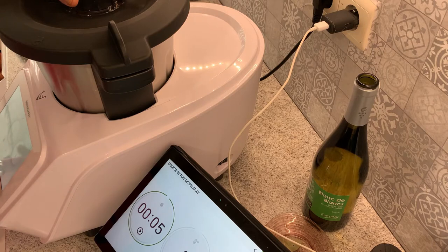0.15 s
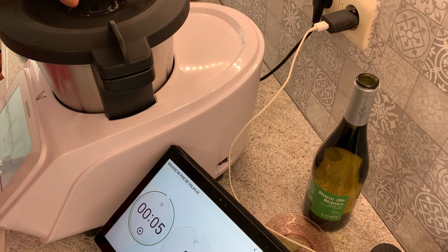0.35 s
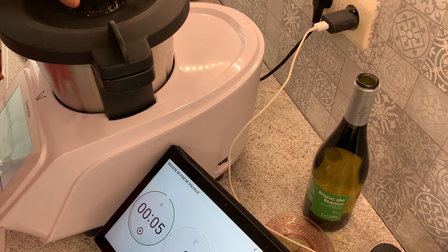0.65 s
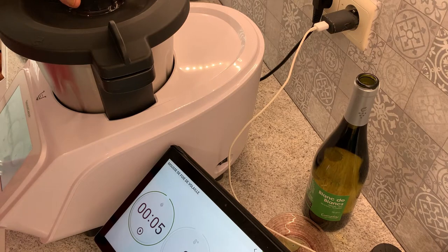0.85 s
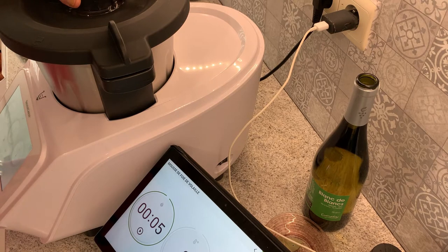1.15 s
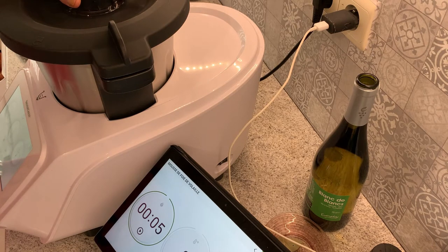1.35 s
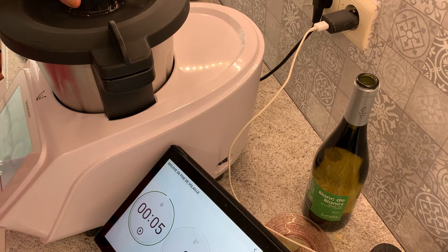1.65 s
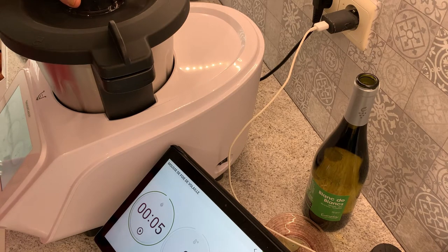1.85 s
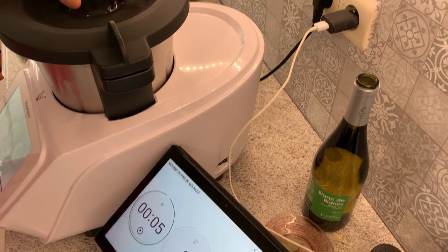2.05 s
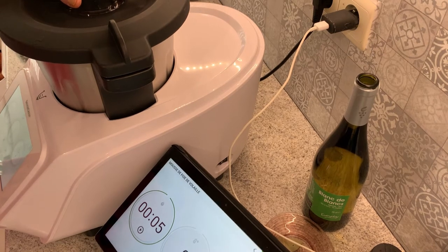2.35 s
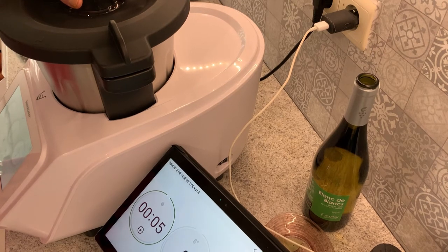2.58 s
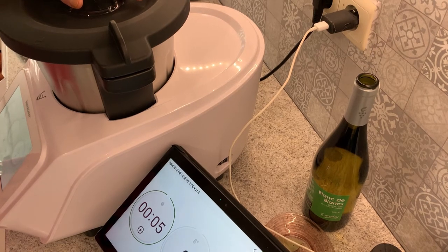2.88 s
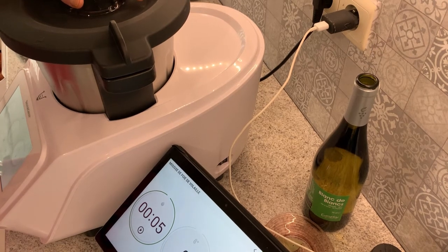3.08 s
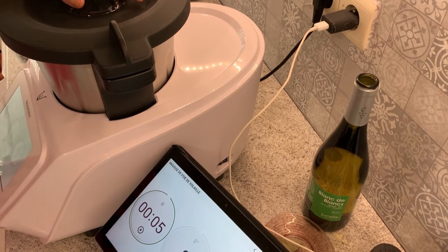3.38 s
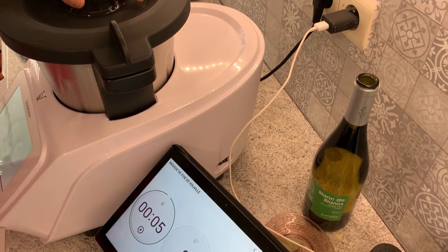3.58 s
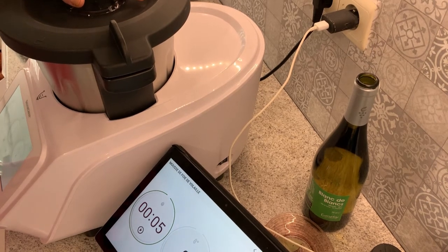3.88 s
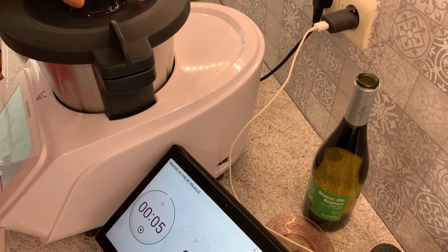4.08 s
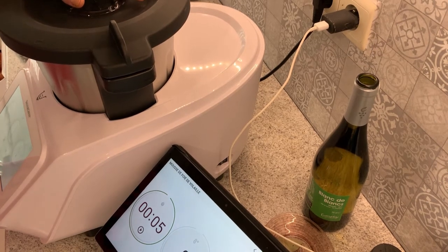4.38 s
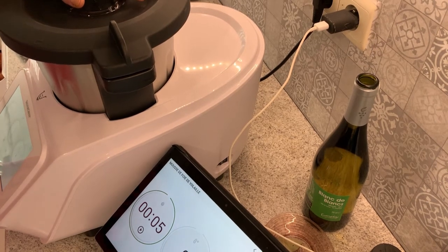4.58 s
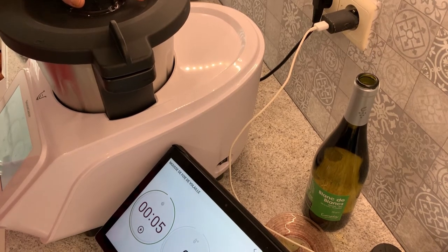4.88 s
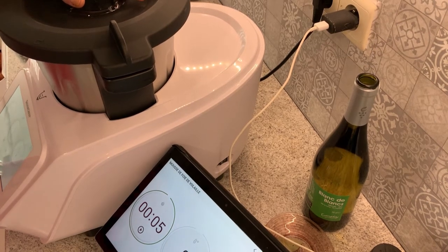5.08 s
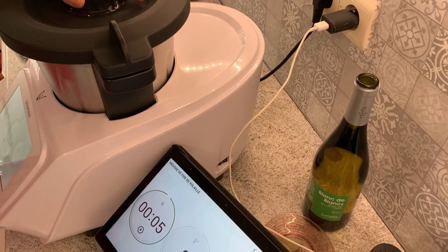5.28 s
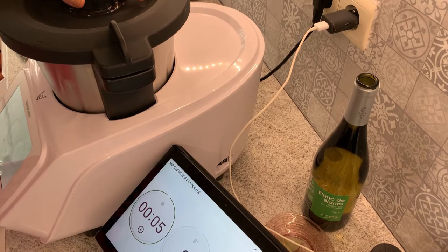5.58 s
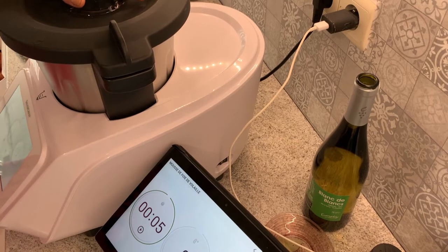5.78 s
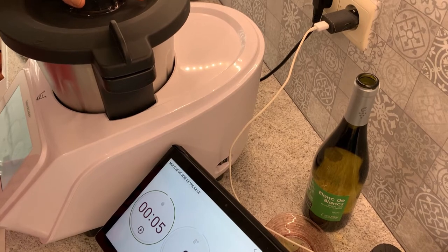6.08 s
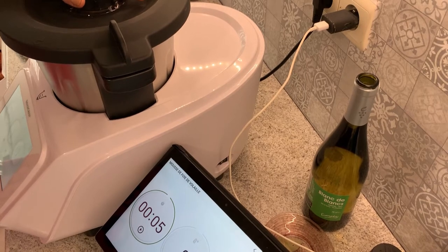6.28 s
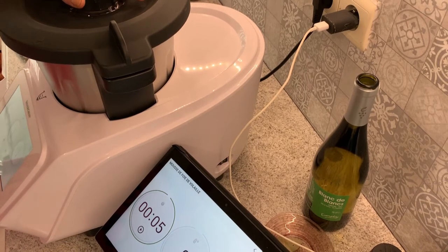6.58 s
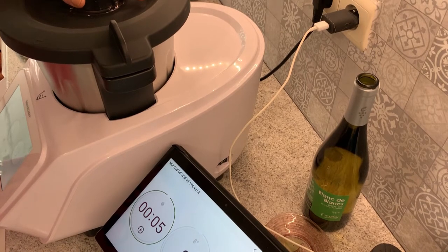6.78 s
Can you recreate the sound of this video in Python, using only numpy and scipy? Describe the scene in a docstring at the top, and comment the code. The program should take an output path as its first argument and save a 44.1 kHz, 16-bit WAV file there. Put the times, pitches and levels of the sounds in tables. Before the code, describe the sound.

In a quiet kitchen, a few dull, hollow knocks sound on a food processor's housing, close to the microphone. A relay clicks and the motor creeps up with a faint hum. Then the blade suddenly kicks in, thrumming under a slowly rising gear whine, while onion chunks thud, crunch and clack against the steel bowl. A fine wet swish builds as the machine keeps running.

```python
"""A tiled kitchen corner: close by, a food processor chops onion in its lidded steel bowl.
Hollow knocks ring the housing, a relay clicks, the motor creeps up softly and then throws the
blade into the onion. The blade thrums the bowl and the gears whine, sagging at big pieces and
climbing as the onion gets finer; chunks tumble, crack and spray against the ringing wall."""
import sys
import numpy as np
from scipy import signal
from scipy.fft import rfft, irfft
from scipy.io import wavfile

SR = 44100
rng = np.random.default_rng(int(sys.argv[2]) if len(sys.argv) > 2 else 0)


def put_to_file(sound):
    """Save the sound as 16-bit audio at rate SR, in the file named by the first command-line argument."""
    columns = np.atleast_2d(sound).T  # one column per channel
    safe = np.clip(columns, -1, 1)
    whole_steps = np.round(safe * 32767)
    wavfile.write(sys.argv[1], SR, whole_steps.astype(np.int16))


N = 306054

# Levels in the tables are relative: each layer sets its own gain.
# blade speed and strain on the gears: t/s, blade passes f/Hz, gear whine level/dB
BLADE_SPEED = [(2.12, 77.6, -9), (2.19, 77.3, 2), (2.29, 77.6, 1), (2.44, 73.6, 1), (2.56, 78, -4),
               (2.72, 77.4, 1), (2.79, 80, -7), (2.87, 83.6, 2), (3.04, 80, -2), (3.13, 83.3, 1),
               (3.3, 82.4, -2), (3.44, 84.2, 4.5), (3.72, 83, 2), (3.87, 87.2, -6), (3.99, 84, -1),
               (4.42, 90, -2), (4.72, 87.3, -2), (5.5, 90.8, -4), (6.21, 92.8, -2), (6.34, 89.8, -3),
               (6.94, 92.8, -1)]
# the blade's thrum: t/s, level/dB
THRUM = [(1.87, -53), (2.02, -29), (2.38, -25), (2.56, -16.5), (2.79, -22.5), (2.9, -17.5), (3.27, -19.5),
         (3.38, -17.5), (3.65, -16.5), (3.92, -22), (4.05, -18.5), (4.57, -18.5), (5.77, -20),
         (6.05, -17.5), (6.94, -16.5)]
# tones of the drive: multiple of the shaft rate, level/dB
DRIVE_ORDERS = [(2, -12), (3, 3), (4, 5.5), (12, 0), (13, -3.5), (14, 3.5), (15, 0), (18, -9), (28, 3)]
# chopped onion circling with the blade: t/s, level/dB
CHURN = [(2.0, 1), (2.65, 0.5), (2.83, -3), (3.1, -2.5), (3.7, 1.5), (3.79, -9), (3.92, -1), (4.2, 0.5),
         (5.05, 2.5), (5.42, -2.5), (5.75, -0.5), (6.1, 0), (6.4, 2), (6.94, 1)]
# the blade ploughs through a big piece: start t/s, length/s, crunch level/dB, tumble level/dB
BITES = [(1.975, 0.14, -23.5, -21), (2.279, 0.088, -17.5, -18), (2.517, 0.15, -20.5, -24.5),
         (2.86, 0.13, -21.5, -48), (3.188, 0.097, -21, -22.5), (3.443, 0.18, -27, -24.5),
         (5.833, 0.047, -33, -20.5), (6.214, 0.032, -19.5, -18.5)]
# featured cuts: t/s, crack level/dB, wall clack level/dB, clack f/Hz
CHOPS = [(2.0507, -6, -18, 2410), (2.0782, -11, -20, 2130), (2.1176, -41, -17.5, 2100),
         (2.261, -11.5, -29, 2360), (2.3073, -9.5, -25, 2130), (2.3533, -25, -25, 2290),
         (2.39, -32, -15.5, 2220), (2.5282, -9.5, -29, 2190), (2.6447, -7, -30, 3700),
         (2.675, -4.5, -44, 2970), (2.7506, -14, -20, 2350), (2.903, -5, -18, 3930), (2.965, -7, -18, 2370),
         (3.1085, -8, -42, 3870), (3.3198, -8, -41, 3430), (3.651, -7, -19, 2480),
         (3.714, -15, -22.5, 2780), (3.8597, -5.5, -20, 2900), (3.9415, -9, -43, 2940),
         (3.9665, -10, -13, 3700), (4.1796, -11.5, -20.5, 3770), (4.243, -8.5, -19, 3650),
         (4.4712, -8, -47, 2500), (4.5422, -11.5, -23, 3940), (4.6675, -11, -27, 2840),
         (4.7773, -9.5, -19.5, 2470), (4.9898, -12.5, -17.5, 2518), (5.1786, -8.5, -16, 2460),
         (5.619, -10.5, -23, 2470), (5.7295, -10.5, -45, 2844), (6.185, -19, -22.5, 2430),
         (6.536, -13.5, -13.5, 2340), (6.563, -11.5, -36, 3130), (6.751, -9, -28, 3900),
         (6.7895, -9, -40, 2957)]
# small hard bits ticking on the lid: t/s, level/dB
LID_TICKS = [(2.428, -9), (2.491, -9.5), (2.5406, -1), (2.6907, -4.5), (2.8693, -7), (2.882, -2),
             (3.2849, -11), (3.5503, -9), (3.8434, -7), (4.293, -3.5), (4.561, -4), (5.34, -7),
             (5.3645, -10), (5.466, -7), (5.4907, -8.5), (5.8064, -5.5), (6.1759, -5.5), (6.2377, -11),
             (6.512, -10)]
# fine wet bits swishing round the wall: t/s, level/dB
SWISH = [(1.9, -73), (2.1, -36), (3.2, -36), (5.0, -32.5), (6.94, -32.5)]
# heavy chunks thrown against the bowl: t/s, level/dB
THUDS = [(1.889, -19), (1.922, -11), (1.994, -6), (2.024, -7), (2.062, -5.5), (2.12, -16), (2.162, -5),
         (2.292, -5), (2.344, -5), (2.379, -4), (2.575, -19), (3.244, -13), (3.54, -12), (3.645, -19),
         (4.453, -13), (4.7, -12), (5.511, -9), (5.932, -7), (6.354, -11), (6.881, -7)]
# the motor's soft start: t/s, shaft f/Hz, level/dB
CREEP = [(.69, 46.6, -89), (.85, 48.2, -60), (1.15, 51.1, -59.5), (1.35, 56, -53.5), (1.5, 59.7, -54.5),
         (1.75, 62.9, -53), (1.9, 65, -53), (2.1, 72.1, -63)]
# its faint tones: multiple of the shaft rate, level/dB
CREEP_ORDERS = [(3, -16), (6, -13), (12, -10.5), (24, -9.5), (32, -10.5), (34, -8), (36, -12), (38, -9)]
# knocks on the housing: t/s, level/dB, contact brightness f/Hz
KNOCKS = [(.085, -35, 160), (.262, -37, 250), (.3945, -28, 1100), (.414, -28, 1100)]
# relay armature, then its contacts: t/s, click level/dB, thump level/dB
RELAY_HITS = [(0.6804, -31, -58), (0.687, -37.5, -30.5)]

# resonances: f/Hz, width/Hz, level/dB
SHELL_MODES = [(1300, 98, 2), (1420, 32, 8), (1504, 150, -7.5), (1660, 35, 6), (2060, 830, -4.5),
               (2950, 68, 3), (3530, 670, -7.5)]  # the shell round the gears
WALL_MODES = [(1990, 60, -2), (2265, 50, -2), (2452, 45, 1), (2610, 50, -4), (2890, 100, 0), (3160, 50, -4),
              (3700, 200, -4), (4450, 90, -6), (4900, 200, -5), (5950, 250, -6), (8400, 400, -7)]  # bright ring of the steel wall
SIZZLE_MODES = [(12250, 420, 0), (13620, 220, .5), (14250, 400, -10)]  # the thin wall under wet bits
BOWL_MODES = [(101.2, 11, 4.5), (149.8, 21.3, -4), (203.7, 15.9, 2), (288.5, 29, -6), (284.2, 24.4, -4),
              (334.6, 30, 0.5), (394.8, 5.9, -1.5), (425.6, 17, -2), (593.2, 43.5, -6), (703, 57, -12),
              (920, 120, -16)]  # low body of the bowl
MOTOR_MODES = [(170, 80, 13), (330, 45, 8), (720, 260, -7), (1220, 780, -16), (2025, 110, -12),
               (2295, 70, -10), (2410, 90, -14)]  # the motor's body
HOUSING_MODES = [(166, 38, -21), (330, 46, -7.5), (395, 19, -3.5), (436, 21, 2.5), (570, 70, -4),
                 (702, 22, -10)]  # the hollow housing
RELAY_MODES = [(1240, 110, 2), (1410, 110, 6), (2130, 150, 1), (2960, 70, 5), (3090, 67, 7), (3630, 360, 2),
               (4300, 1200, -11)]  # ring of the relay
MOUNT_MODES = [(180, 24, 17), (355, 155, 9.3)]  # thump of its mount

# spectra: f/Hz, level/dB
CRUNCH_EQ = [(200, 5), (700, 1), (1100, 6), (1900, -0.5), (2500, 4.5), (4800, 3), (7200, 4.1), (8600, 4),
             (11200, 4), (13700, -2.5), (14400, 3), (15700, -1)]  # bursting onion cells
SNAP_EQ = [(100, -10), (400, -6), (1500, 1), (4500, -5), (8000, 10.5), (13000, 5), (16000, 3)]  # the relay's bright edge
ROOM_EQ = [(15, -50), (69, -6.5), (135, -15), (176, -13), (769, -26.5), (1000, -34), (1280, -32),
           (1460, -38.5), (3260, -54), (15000, -63)]  # low room rumble

# how alike left and right sound: f/Hz, likeness/0-1
LIKENESS = [(90, .98), (200, .94), (350, .75), (600, .62), (1400, .42), (3000, .5), (5000, .55),
            (6800, .68), (8300, .8), (9100, .994), (13300, .99), (16000, .85)]
# phase between left and right, which sets the stereo width: f/Hz, left lead/rad
STEREO_PHASE = [(100, 0), (600, -.3), (1400, -1.65), (2100, 1.1), (3200, 1.1), (4700, -.7), (6500, 0),
                (8300, 1.7), (9050, 3.0), (10250, 3.25), (10600, 3.9), (12500, 6.1), (13700, 6.4),
                (15700, 8.6)]
# stereo balance: f/Hz, left minus right level/dB
BALANCE = [(100, .5), (180, .8), (300, -1.2), (600, -3.5), (1400, -1.8), (3000, .2), (5000, 3.5),
           (7500, -.3), (12000, 0)]


def blade(pass_hz, flutter_db=1.3, slip_rad=0.63, octave_db=-22):
    """The blade shakes the bowl once per pass; the shifting load makes it flutter."""
    angle = 2 * np.pi * np.cumsum(pass_hz) / SR + slip_rad * drift(3.1)
    tone = np.sin(angle) + from_db(octave_db) * np.sin(2 * angle)
    thrum_db = in_time(THRUM)[0] + flutter_db * drift(24)
    return stereo(from_db(thrum_db) * rms_one(tone), np.zeros(N))


def drive(pass_hz, strain_db, shaft_ratio=17 / 14, teeth=14, backlash_rad=0.13, gain_db=-26):
    """The gears sing at their tooth rate; rough shaft tones surge as they cross shell resonances."""
    angle = 2 * np.pi * np.cumsum(pass_hz) / SR * shaft_ratio
    chatter_rad = .45 + .08 * np.maximum(pass_hz - 84, 0)  # the teeth chatter more at high speed
    paths = []
    for _ in range(2):
        tones = 0
        for order, db in DRIVE_ORDERS:
            level = from_db(db + 4 * drift(15))
            loose_angle = angle + backlash_rad * drift(27)  # play smears the high orders most
            tones += level * np.sin(round(order) * loose_angle)
        voiced = resonate(tones, SHELL_MODES) + from_db(-12) * tones
        rattle = resonate(grains(per_s=2100, spread_db=-4), SHELL_MODES)
        growl = from_db(-2.5) * rms_one(voiced) + from_db(-6.5) * rms_one(rattle)
        whine_db = strain_db - 3 + 2.5 * drift(20)
        whine = from_db(whine_db) * rms_one(np.sin(teeth * angle + chatter_rad * drift(20)))
        paths.append(from_db(gain_db) * (growl + whine))
    return stereo(*paths)


def crunch(mince_db, nicks_per_s=110):
    """Onion cells burst in clumps; each clean cut is a sharp crack and a spray of bits."""
    cuts = all_cuts()
    times, crack_db = cuts.T[:2]
    hits = strikes(times, crack_db)
    nicks = (rng.random(N) < nicks_per_s / SR) * rng.random(N)  # small pieces meet the blade
    clumps = from_db(-5) + from_db(-3) * die_away(nicks, t60=0.095)
    mince = from_db(mince_db - 3) * rms_one(clumps)
    cracks = from_db(9) * cut_force(hits, tail_s=0.0046)
    spray = from_db(-13) * cut_force(hits, tail_s=0.21)
    envelope = np.sqrt(mince ** 2 + cracks ** 2 + spray ** 2)
    paths = []
    for _ in range(2):
        bursts = envelope * grains(per_s=3600, spread_db=-2)
        cells = from_db(-0.5) * colour(bursts + ticks(hits), CRUNCH_EQ)
        wall = sum(resonate(cells, [mode]) for mode in WALL_MODES)
        paths.append(cells + wall + swish() + clacks(cuts) + patter(mince_db))
    return stereo(*paths)


def all_cuts(small_count=10, from_s=4.0, spread_db=8, low_hz=2340, high_hz=4170):
    """The featured cuts, plus lesser ones of random time, strength and pitch once the pieces circle."""
    when, strength, pitch = rng.random((small_count, 3)).T
    times = from_s + when * ((N - 1) / SR - from_s)
    swing_db = spread_db * (2 * strength - 1)
    crack_db, clack_db = swing_db - 19.5, swing_db - 32.5
    clack_hz = low_hz + pitch * (high_hz - low_hz)
    return np.vstack([CHOPS, np.transpose([times, crack_db, clack_db, clack_hz])])


def cut_force(hits, tail_s, edge_t60=.012):
    """The force of a cut builds while the edge bites in, then dies away."""
    return die_away(hits, tail_s + edge_t60) - die_away(hits, edge_t60)


def onion_load(mince_db=-29, tumble_db=-22.5, attack_s=.025, release_s=.06):
    """Crunch and tumble envelopes in dB: each bite swells, holds and lets go over the churn."""
    t = np.arange(N) / SR
    churn_db, = in_time(CHURN)
    power = from_db([churn_db + mince_db, churn_db + tumble_db]) ** 2
    for start, length, crunch_db, chunks_db in BITES:
        grip = np.interp(t - start, [0, attack_s, length, length + release_s], [0, 1, 1, 0])
        power += (grip * from_db([[crunch_db], [chunks_db]])) ** 2
    return 10 * np.log10(power)


def tumble(chunks_db, thud_gain_db=43, soft_hz=500):
    """Soft chunks keep the bowl ringing; heavy ones move only its lowest resonances."""
    common, apart = [resonate(grains(per_s=600, spread_db=2.5), BOWL_MODES) for _ in range(2)]
    level = from_db(chunks_db + 1)
    pushes = soften(strikes(*np.transpose(THUDS)), soft_hz)
    thuds = from_db(thud_gain_db) * resonate(pushes, BOWL_MODES[:4])
    return stereo(level * rms_one(common) + thuds, level * rms_one(apart))


def clacks(cuts, gain_db=13, hit_db=5, hit_t60=0.0062, rattle_t60=.09, width_hz=520):
    """Each flung piece hits the steel wall hard, then rattles on it at a pitch of its own."""
    out, t = np.zeros(N + SR), np.arange(SR // 10) / SR
    force = from_db(hit_db - 60 * t / hit_t60) + from_db(-60 * t / rattle_t60)
    for s, _, clack_db, hz in cuts:
        contact = rng.standard_normal(len(t)) * from_db(gain_db + clack_db) * force
        start = round(s * SR)
        out[start:start + len(t)] += resonate(contact, [(hz, width_hz, 0)])
    return out[:N]


def ticks(cut_hits, lid_db=-12.5, skin_db=-13):
    """Short grainy ticks: hard bits strike the lid, and the skin gives way as each cut opens."""
    clicks = from_db(lid_db) * strikes(*np.transpose(LID_TICKS)) + from_db(skin_db) * cut_hits
    return die_away(clicks, t60=0.034) * grains(per_s=7000, spread_db=-2)


def patter(mince_db, bits_per_s=220, width_hz=150, gain_db=-9):
    """Diced bits pepper the wall at random; each stirs one of its resonances for a moment."""
    rings = 0
    for hz, _, db in WALL_MODES:
        bits = grains(per_s=bits_per_s / len(WALL_MODES), spread_db=2.5)
        rings += resonate(bits, [(hz, width_hz, db)])
    return from_db(gain_db + mince_db) * rms_one(rings)


def swish():
    """Fine wet bits sweep round the thin wall and make it sizzle."""
    sizzle = sum(resonate(rng.standard_normal(N), [mode]) for mode in SIZZLE_MODES)
    return from_db(in_time(SWISH)[0]) * rms_one(sizzle)


def knocks(gain_db=47):
    """Dull knocks ring the hollow housing."""
    pushes = sum(soften(strikes([s], db), soft_hz) for s, db, soft_hz in KNOCKS)
    return kitchen(from_db(gain_db) * resonate(pushes, HOUSING_MODES), t60=0.28, wet_db=-5)


def relay(gain_db=25, snap_db=-15):
    """The relay snaps, thumps its mount and leaves a short echo."""
    times, click_db, thump_db = np.transpose(RELAY_HITS)
    clicks = strikes(times, click_db)
    ring = resonate(clicks, RELAY_MODES)
    thump = resonate(strikes(times, thump_db), MOUNT_MODES)
    snap = from_db(snap_db) * colour(clicks, SNAP_EQ)
    return from_db(gain_db) * kitchen(ring + thump + snap, t60=0.26, wet_db=8)


def soft_start(flutter_db=4, rub_db=9, rub_hz=1700):
    """The slow rotor creeps up unevenly, sliding its tones through the motor's resonances."""
    shaft_hz, level_db = in_time(CREEP)
    angle = 2 * np.pi * np.cumsum(shaft_hz) / SR
    tones = sum(from_db(db + flutter_db * drift(7.6)) * np.sin(round(order) * angle)
                for order, db in CREEP_ORDERS)
    rub = from_db(rub_db) * soften(rng.standard_normal(N), rub_hz, order=1)
    hum = rms_one(resonate(tones + rub, MOTOR_MODES))
    return kitchen(from_db(level_db) * hum, t60=0.15, wet_db=3)


def room_tone(level_db=-52.5):
    """A quiet bed of low rumble under everything."""
    air = stereo(*rng.standard_normal((2, N)))
    return from_db(level_db) * rms_one(colour(air, ROOM_EQ))


def kitchen(x, t60, wet_db):
    """The direct sound and a diffuse tail from worktop and tiles."""
    decay = from_db(-60 * np.arange(SR // 2) / SR / t60)
    tails = from_db(wet_db) * rng.standard_normal((2, len(decay))) * decay / np.linalg.norm(decay)
    common, apart = [signal.fftconvolve(x, tail)[:N] for tail in tails]
    return stereo(x + common, apart)


def stereo(common, apart):
    """Left and right share part of the sound; the phase between them, by frequency, sets the width."""
    alike = np.clip(per_bin(LIKENESS), 0, 1)
    sides = np.array([[1], [-1]])
    field = np.sqrt((1 + alike) / 2) * rfft(common) + sides * np.sqrt((1 - alike) / 2) * rfft(apart)
    balance = from_db(sides * per_bin(BALANCE) / 2)
    phase_turn = np.exp(.5j * sides * per_bin(STEREO_PHASE))
    return irfft(field * balance * phase_turn, N)


def resonate(x, modes):
    """Parallel resonances of alternating sign."""
    out = 0
    for k, (hz, width, db) in enumerate(modes):
        r = np.exp(-np.pi * width / SR)
        poles = [1, -2 * r * np.cos(2 * np.pi * hz / SR), r * r]
        gain = (-1) ** k * from_db(db) * (1 - r * r) / 2
        out += gain * signal.lfilter([1, 0, -1], poles, x + 1e-18)
    return out


def grains(per_s, spread_db):
    """Random tiny impacts; a positive spread makes a few stand out, a negative one sinks a few."""
    sizes = from_db(spread_db * np.minimum(rng.exponential(1, N), 4)) * rng.choice([-1, 1], N)
    return rms_one(sizes * (rng.random(N) < per_s / SR))


def strikes(times, db):
    """One click per event."""
    clicks = np.zeros(N)
    clicks[np.round(np.asarray(times) * SR).astype(int)] = from_db(db)
    return clicks


def die_away(clicks, t60):
    """Each click starts an envelope that falls 60 dB in t60 seconds."""
    return signal.lfilter([1], [1, -from_db(-60 / (t60 * SR))], clicks + 1e-18)


def drift(rate_hz):
    """Slow random wander at unit RMS."""
    hz = np.fft.rfftfreq(N, 1 / SR)
    return rms_one(irfft(rfft(rng.standard_normal(N)) / (1 + (hz / rate_hz) ** 2), N))


def soften(x, hz, order=2):
    """Roll off the top."""
    return signal.sosfilt(signal.butter(order, hz, fs=SR, output="sos"), x + 1e-18)


def colour(x, spectrum):
    """Shape a sound with an EQ curve."""
    return irfft(rfft(x) * from_db(per_bin(spectrum)), N)


def per_bin(points):
    """A curve over frequency, read at every FFT bin."""
    hz, value = np.transpose(points)
    return np.interp(np.log(np.fft.rfftfreq(N, 1 / SR) + 1), np.log(hz), value)


def in_time(rows):
    """The columns of an automation curve, sample by sample."""
    times, *columns = np.transpose(rows)
    return [np.interp(np.arange(N) / SR, times, column) for column in columns]


def fade_in(start_s, rise_s):
    """Silence, then a straight rise to full level."""
    return np.clip((np.arange(N) / SR - start_s) / rise_s, 0, 1)


def from_db(db):
    """Decibels to amplitude."""
    return 10 ** (np.asarray(db) / 20)


def rms_one(x):
    """Scale to unit RMS."""
    return x / np.sqrt(np.mean(x ** 2) + 1e-20)


def scene():
    """The machine at work over a quiet room."""
    speed_hz, strain_db = in_time(BLADE_SPEED)
    pass_hz = speed_hz * (1 + 0.002965 * drift(5.75))  # the shifting load makes the drive waver
    mince_db, chunks_db = onion_load()
    spin_up = fade_in(1.868, rise_s=0.11)
    machine = spin_up * blade(pass_hz) + fade_in(2.0, rise_s=0.1) * drive(pass_hz, strain_db)
    onion = spin_up * tumble(chunks_db) + fade_in(1.948, rise_s=0.045) * crunch(mince_db)
    return machine + onion + soft_start() + knocks() + relay() + room_tone()


def record(dry, low_cut_hz=42, high_cut_hz=15850):
    """The microphone sheds the deep bass; peaks clip at full scale and the very top is cut."""
    lean = signal.sosfilt(signal.butter(2, low_cut_hz, "high", fs=SR, output="sos"), dry)
    top_cut = signal.ellip(10, .2, 70, high_cut_hz, fs=SR, output="sos")
    return signal.sosfilt(top_cut, np.clip(lean, -1, 1))


dry = scene()
out = record(dry)
put_to_file(out)
```